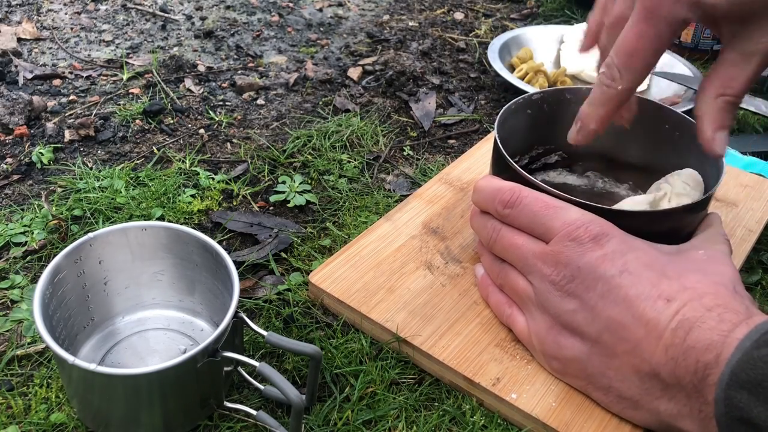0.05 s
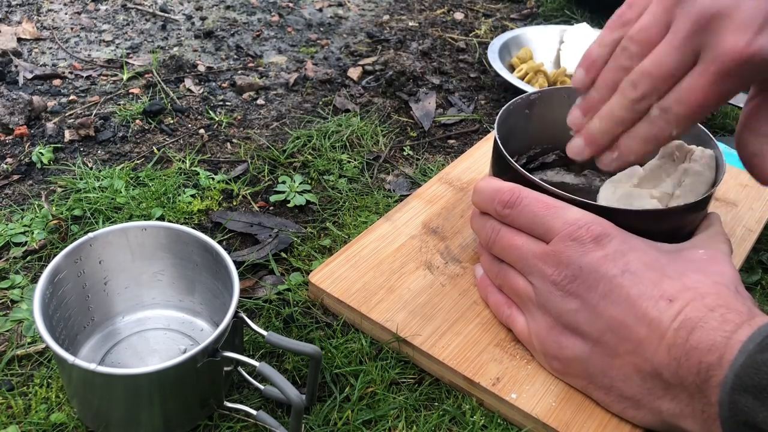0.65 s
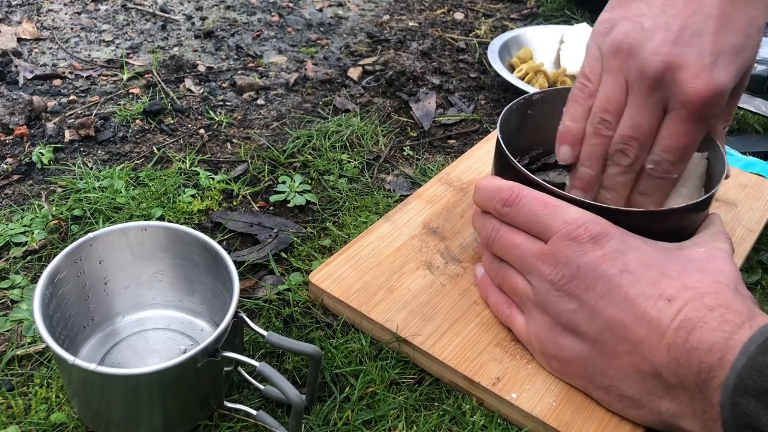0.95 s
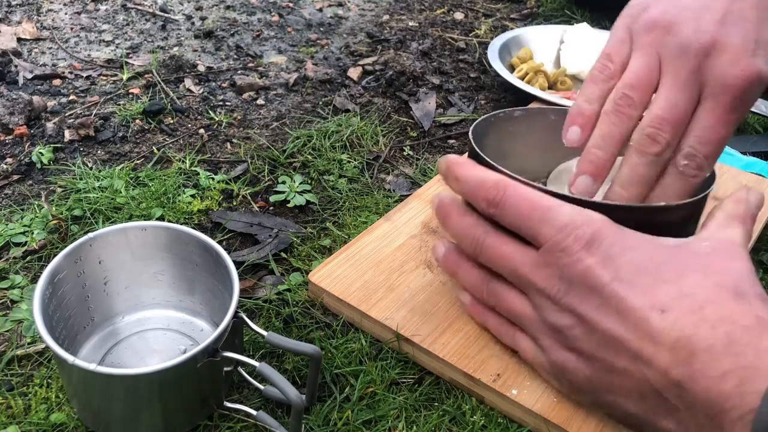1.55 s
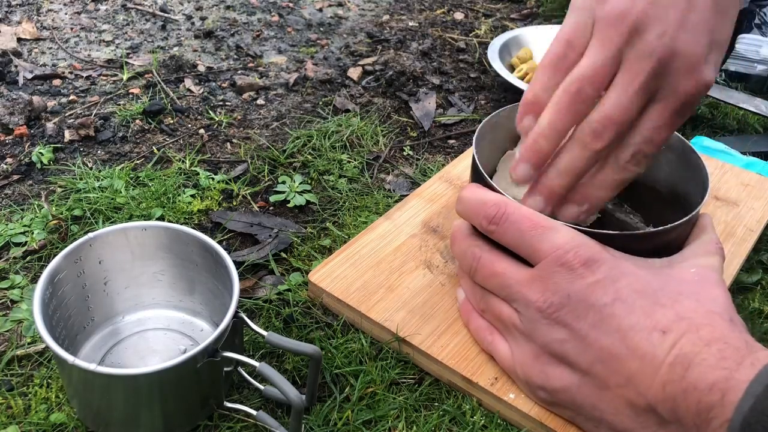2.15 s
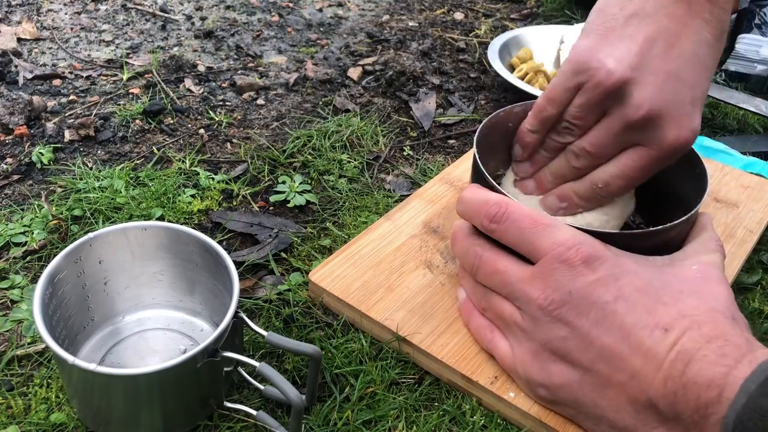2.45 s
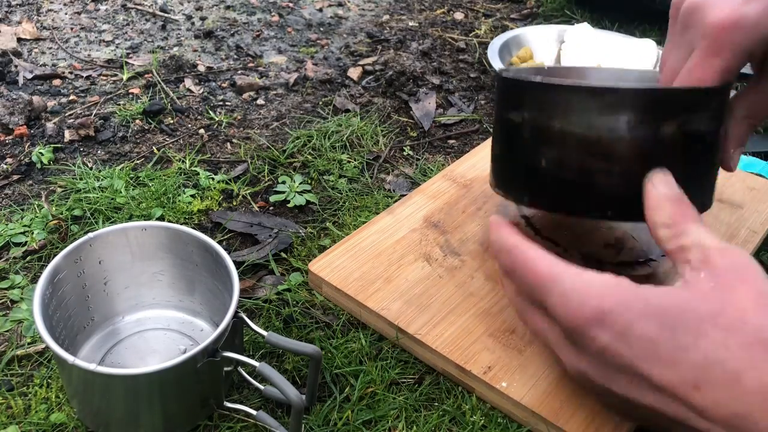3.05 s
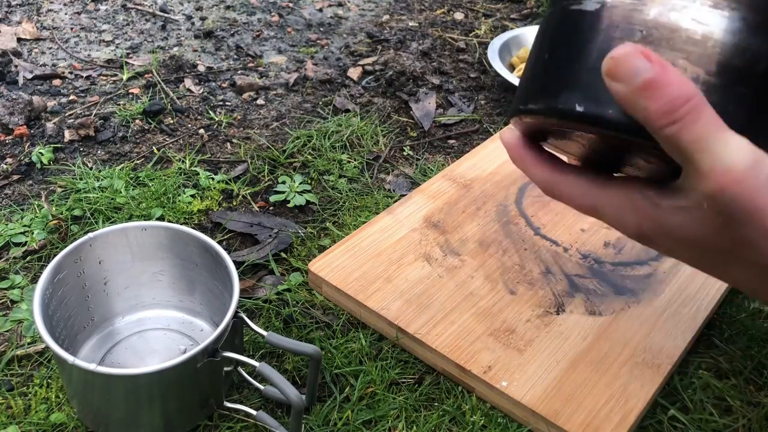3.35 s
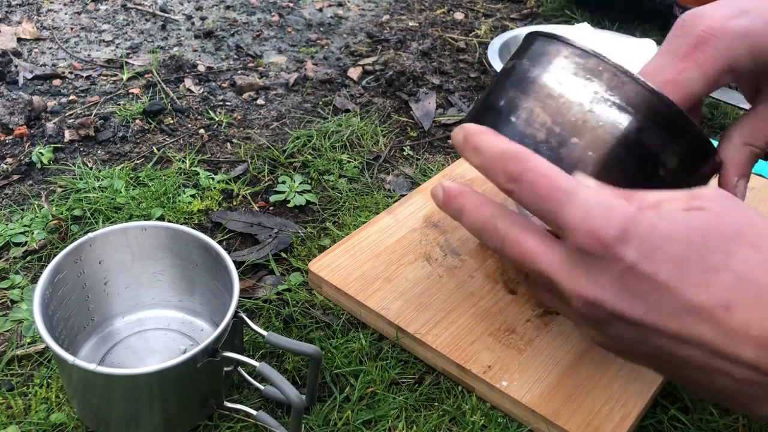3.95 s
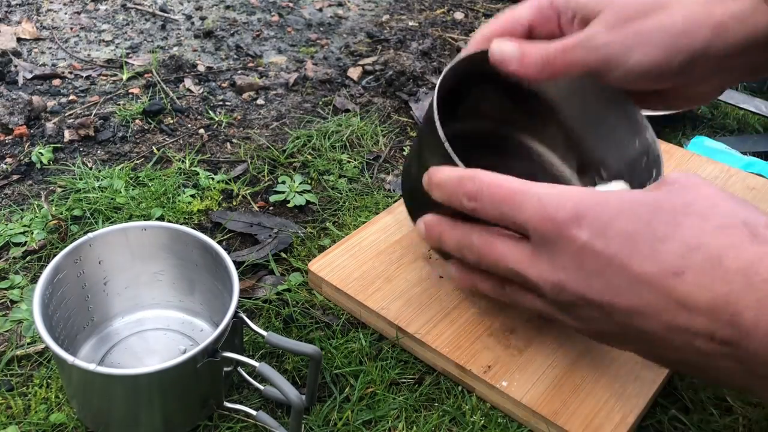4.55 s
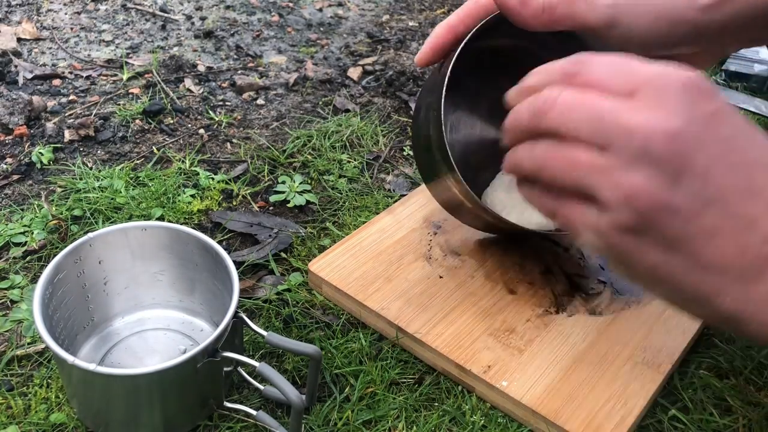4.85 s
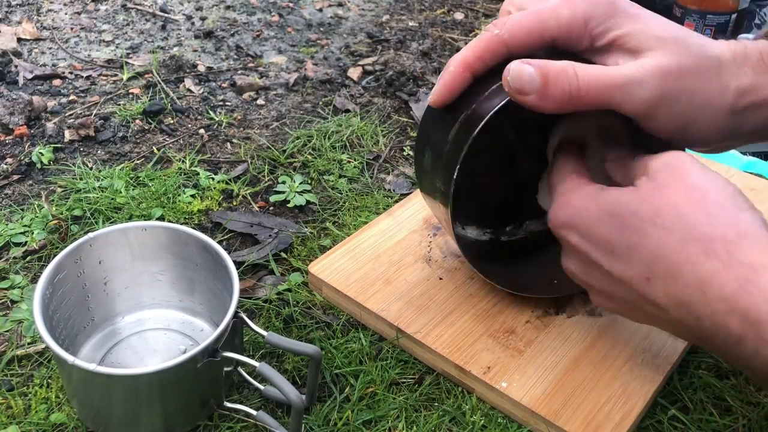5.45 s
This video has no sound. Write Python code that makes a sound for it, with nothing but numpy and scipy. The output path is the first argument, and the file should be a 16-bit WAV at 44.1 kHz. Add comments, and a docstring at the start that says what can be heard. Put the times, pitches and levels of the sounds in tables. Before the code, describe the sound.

Close up in the open air, dough and skin rub quietly along the inside of a metal pot, each push ending in a small smack. Much louder, the pot hits a wooden board with a brief ring, then scrapes. A little later come another scrape, a dull thud, a click of grit and a quick skid, then two choked knocks. The kneading carries on throughout above a faint hiss and low rumble.

```python
"""Outdoors, over faint hiss and rumble, a hand kneads dough in a small metal pot on a wooden board.
From the start, dough and skin rub along the wall, each push ends in a smack, and fingers tap the pot.
At 1.4 s the pot knocks hard on the board, its wall rings on, and its edge drags.
Near 2.75 s it slips with a scrape, a thud, a sharp click of grit and a short skid.
Two more knocks, choked by the grip, land at 3.9 s and 4.7 s, and the kneading carries on to the end."""
import sys
import numpy as np
from scipy import signal
from scipy.fft import rfft, irfft, next_fast_len
from scipy.io import wavfile
from scipy.ndimage import uniform_filter1d

SR = 44100
rng = np.random.default_rng(int(sys.argv[2]) if len(sys.argv) > 2 else 0)


def materialize(psi):
    """Save the field psi as 16-bit PCM at rate SR to the path in sys.argv[1].

    A 1-D psi becomes a single channel; in a 2-D psi each row is a channel.
    """
    bounded = np.clip(np.atleast_2d(psi).T, -1, 1)
    quanta = np.round(bounded * 32767).astype(np.int16)
    wavfile.write(sys.argv[1], SR, quanta)


N = 246955

# EQ curves for the noise layers. Each row: frequency in Hz, relative level in dB.
AIR_EQ = [(100, -2), (400, -5), (800, -12), (1500, -15.5), (3000, -17.5), (6000, -21.5), (9500, -27),
          (12000, -44), (16000, -51)]  # far outdoor hiss
RUMBLE_EQ = [(20, -29.5), (32, -20), (45, -6), (65, -4), (100, 0), (135, -2.5), (200, -9.5), (300, -18),
             (600, -50)]  # outdoor low end
RUB_EQ = [(1180, -63), (2000, -6), (2660, -4.5), (2900, -1.5), (4350, -2), (4740, -2), (6400, -3),
          (7270, -3.5), (11000, -7), (14300, -57.5), (22000, -120)]  # dough and skin on metal
BODY_EQ = [(200, -24), (450, -5), (800, 3.5), (1300, -1.5), (1900, -1.5), (2600, -11), (4000, -29.5)]  # the pot's hollow midrange
FIZZ_EQ = [(8000, -17.5), (10000, -2.5), (11500, 2.5), (13000, 0.5), (14500, -5), (15700, -5.5)]  # sticky dough
SNAP_EQ = [(1180, -56.5), (2000, -24), (2460, -8.5), (3120, -6.5), (4260, 4), (5030, 7), (6140, 12.5),
           (7980, 7.5), (8630, 6), (15500, 4), (16000, -32)]  # bright clicks and smacks
SKID_EQ = [(100, -27), (160, -3), (430, -19), (700, 10), (900, -6), (1200, -22), (1750, -10.5), (2400, -14),
           (3700, -11), (5000, -16), (7500, -12.5), (11000, -28), (16000, -40)]  # the base juddering on wood

# Resonances of the pot. Each row: frequency in Hz, width in Hz, relative level in dB.
HELD_POT_PEAKS = [(770, 150, 0.5), (1170, 70, 1), (1804, 44, 0), (3450, 90, -3), (4210, 78, 3),
                  (4940, 120, 6), (6450, 220, 7), (8310, 270, 4.5), (9070, 450, 11.5)]  # held, with dough inside
RIM_PEAKS = [(2940, 65, 15), (3626, 21, 17), (3830, 20, 9), (3880, 28, 16.5), (4302, 25, 14)]  # narrow rim tones in the skid
DRAG_PEAKS = [(789, 74, 0.5), (1186, 150, -10.5), (1740, 104, -5.5), (1885, 110, -10.5), (3010, 95, -15.5),
              (3430, 88, -13), (4490, 78, -11), (5530, 200, -19.5), (6550, 120, -21.5), (7800, 260, -20.5),
              (9700, 250, -21)]  # dragged on its edge

# The thin wall's ring. Each row: frequency in Hz, nominal t60 in seconds, relative level in dB.
FREE_WALL_MODES = [(750, 0.083, -28.5), (787, 0.14, -35), (1161, 0.18, -22), (1710, 0.14, -31),
                   (2200, .2, -59), (3400, 0.14, -46.5), (5250, .16, -53), (5520, 0.16, -55)]  # after a knock
PING_MODES = [(3626, 0.049, -20.5), (4340, 0.017, -8.5), (6160, 0.086, -22), (8549, 0.03, -11),
              (11230, 0.033, -17.5)]  # after a click
# Pot and board in contact. Each row: frequency in Hz, nominal t60 in seconds,
# then relative levels in dB when struck on the base, on the heel and on the wall.
POT_ON_BOARD_MODES = [(311.4, 0.015, -12, -10, -11), (394, 0.0055, -7, -4.5, -10.5),
                      (521, 0.056, -18.5, -15.5, -36), (570.5, 0.049, -23, -18.5, -15),
                      (744, 0.016, 3, 3, 2.5), (815.6, 0.0095, 5.5, 5.5, 6), (1119, 0.014, -7.5, -4.5, -4),
                      (1161, 0.035, -23.5, -18, -4), (1420, 0.0031, -28, -10, -4),
                      (1677, 0.046, -16, -19, -23.5), (1876, 0.029, -20, -25.5, -13.5),
                      (2172, 0.023, -38, -43, -12), (2802, 0.024, -45.5, -33.5, -19),
                      (3260, 0.016, -40.5, -46, -29.5), (3540, 0.021, -47.5, -37.5, -31),
                      (3930, 0.017, -51.5, -47, -32.5), (4370, 0.027, -45, -39.5, -46)]

# Fader curve for hands that never leave the pot. Each row: time in seconds, relative level in dB.
HANDLING_FADER = [(0.0, -64), (0.45, -65.5), (0.56, -87), (0.78, -72.5), (1.51, -60.5), (2.26, -70),
                  (2.63, -54.5), (2.74, -57), (3.24, -58.5), (3.48, -62), (3.76, -59.5), (3.96, -67.5),
                  (4.23, -69), (4.35, -58), (5.01, -65.5), (5.6, -60.5)]
# The hand pushes dough along the wall.
# Each row: start and release in seconds, rubbing level in dB, relative pressure on the pot in dB.
PUSH_CUES = [(0.271, 0.402, -58.5, -1), (0.476, 0.634, -59, -0.5), (0.739, 0.836, -58.5, 0),
             (0.909, 1.037, -57.5, 0.5), (1.215, 1.251, -52, 5.5), (1.48, 1.602, -53, 0.5),
             (1.777, 1.877, -52, 0.5), (2.55, 2.718, -41.5, 1.5), (2.923, 2.983, -62, 15.5),
             (3.653, 3.803, -51.5, -3), (3.76, 3.918, -53, -3.5), (4.131, 4.184, -59.5, -5.5),
             (4.202, 4.429, -56, -7), (4.6, 4.808, -58, 0), (5.193, 5.297, -58, -4.5),
             (5.333, 5.484, -57.5, 2)]
# Dough peels off the metal. Each row: start in seconds, rubbing level in dB, relative pressure in dB.
PEEL_CUES = [(.191, -53, 1.5), (1.648, -55.5, 7.5), (2.851, -51.5, -6), (4.495, -59, -10),
             (4.984, -56, -12)]
# The pot's edge drags on the board.
# Each row: start and length in seconds, level in dB, pitch factor from tilt and grip.
SCRAPE_CUES = [(1.394, 0.061, -45, 1.03), (1.45, 0.21, -51, .95), (1.525, .035, -45, 0.95),
               (1.57, .046, -42.5, 1.02), (2.543, 0.25, -47, 1), (3.758, 0.12, -49, 1.07),
               (4.25, 0.066, -47.5, 0.974), (4.352, 0.022, -43, 0.96), (4.395, 0.045, -51, 1)]
# Grit clicks under the pot. Each row: start in seconds, level in dB, decay time in seconds.
GRIT_CUES = [(1.655, -41, 0.0074), (2.7, -34, .01), (2.7511, -18.5, .0022), (2.857, -41, 0.012),
             (4.358, -44, 0.0046), (4.714, -39.5, .002)]
# Sticky fingers tick faintly. Each row: start in seconds, relative level in dB.
TICK_CUES = [(0.7746, -48), (2.0194, -48), (2.2393, -45.5), (3.2266, -45.5), (4.04, -49.5)]
# Soft taps of fingers and pot. Each row: start in seconds, relative level in dB, centre in Hz.
TAP_CUES = [(0.544, -32.5, 860), (0.776, -43.5, 880), (0.834, -37.5, 1050), (1.248, -35.5, 520),
            (2.751, -24, 700), (3.162, -32, 1200), (3.468, -42.5, 820), (4.207, -31, 750),
            (4.524, -37, 547), (4.848, -40, 522)]
# The pot's weight shifts. Each row: start in seconds, level in dB, centre in Hz, decay time in seconds.
THUD_CUES = [(2.724, -33, 197, 0.0095), (3.16, -43, 390, 0.041)]
# Hard knocks. Each row: start in seconds, level in dB, spot struck (0 base, 1 heel, 2 wall),
# relative free wall ring in dB, ring time factor left by the grip,
# rebound delay in seconds, relative rebound level in dB.
KNOCK_CUES = [(1.3896, 0, 0, -0.5, 1.04, 0.0015, -10.5), (3.8589, 2.16, 1, -23.5, 1, .00266, -13.5),
              (4.714, 0.3, 2, -23, 0.95, 0.002064, -10.5)]


def gain_of(db):
    """Decibels to a factor."""
    return 10 ** (np.asarray(db) / 20)


def unit_rms(x):
    """Scales to rms 1."""
    return x / np.sqrt(np.mean(x ** 2) + 1e-20)


def add(mix, start, sound):
    """Lays a sound into the mix at a start time in seconds."""
    part = mix[max(round(start * SR), 0):][:len(sound)]
    part += sound[:len(part)]


def equalised(x, curve, peaks=()):
    """Runs x through an EQ curve with resonant peaks on top, at rms 1."""
    size = next_fast_len(len(x))
    hz = np.fft.rfftfreq(size, 1 / SR)
    curve_hz, curve_db = np.transpose(curve)
    shape_db = np.interp(np.log(hz + 1), np.log(curve_hz), curve_db)
    for centre, width, lift in peaks:
        shape_db += lift / (1 + (2 * (hz - centre) / width) ** 2)
    return unit_rms(irfft(rfft(x, size) * gain_of(shape_db), size)[:len(x)])


def drift(per_s, size=SR):
    """A slow random wander of rms 1."""
    return unit_rms(np.interp(np.arange(size) * per_s / SR, np.arange(size), rng.standard_normal(size)))


def slips(per_s, spread_db, size=SR):
    """Friction: a dense train of tiny slips of uneven height."""
    height = gain_of(spread_db * np.minimum(rng.exponential(1, size), 4))
    return unit_rms(height * rng.choice([-1, 1], size) * (rng.random(size) < per_s / SR))


def ring(modes, t):
    """Decaying sine modes; neighbours swing in opposite directions."""
    return sum((-1) ** k * gain_of(db - 60 * t / t60) * np.sin(2 * np.pi * hz * t)
               for k, (hz, t60, db) in enumerate(modes))


def pot_burst(curve, decay_s, attack_s):
    """A noise hit coloured by the held pot, its energy in proportion to its decay time."""
    t = np.arange(SR // 4) / SR
    noise = equalised(rng.standard_normal(len(t)), curve, HELD_POT_PEAKS)
    hit = noise * np.exp(-t / decay_s) * (1 - np.exp(-t / attack_s))
    return hit * np.sqrt(decay_s * SR / 2 / np.sum(hit ** 2))


def outdoors(air_db=-59.5, rumble_db=-55, swell_db=1.3):
    """The bed: a steady far hiss over a low, gently swelling rumble."""
    air = equalised(rng.standard_normal(N), AIR_EQ)
    rumble = equalised(rng.standard_normal(N), RUMBLE_EQ)
    return gain_of(air_db) * air + gain_of(rumble_db + swell_db * drift(per_s=8.5, size=N)) * rumble


def dappled(x, depth_db=3.5):
    """A moving hand shifts the pot's many small resonances: bands swell and fade in patches."""
    spectrogram = signal.stft(x, nperseg=512)[2]
    across_bands = uniform_filter1d(rng.standard_normal(spectrogram.shape), size=5, axis=0)
    patches = unit_rms(uniform_filter1d(across_bands, size=8, axis=1))
    patchy = signal.istft(spectrogram * gain_of(depth_db * patches))[1]
    return x.std() * unit_rms(patchy[:len(x)])


def rubbing(pressure_db, size=SR, body_db=-0.5, fizz_db=-6, uneven_db=2):
    """Dough and skin hiss as they slip; pressing brings out the pot, a light touch the sticky fizz."""
    grab = gain_of(uneven_db * drift(per_s=100, size=size))  # the dough grabs and lets go
    hiss = equalised(slips(per_s=10000, spread_db=2, size=size), RUB_EQ)
    body = equalised(slips(per_s=6000, spread_db=0.5, size=size), BODY_EQ, HELD_POT_PEAKS)
    fizz = equalised(slips(per_s=5500, spread_db=-2.5, size=size), FIZZ_EQ)
    blend = hiss + gain_of(body_db + pressure_db) * body + gain_of(fizz_db - pressure_db / 2) * fizz
    return dappled(grab * blend)


def kneading(handling_trim_db=-2, release_s=0.02, peel_attack_s=0.008, peel_fade_s=0.061):
    """Pushes build up and let go, peels start at once and fade; light rubbing goes on between them."""
    t = np.arange(SR) / SR
    handling_db = np.interp(np.arange(N) / SR, *np.transpose(HANDLING_FADER))
    out = gain_of(handling_trim_db + handling_db) * rubbing(pressure_db=3, size=N)
    for start, end, db, pressure_db in PUSH_CUES:
        build = np.minimum(t / (end - start), 1) ** 0.98  # friction grows with the way travelled
        release = np.exp(-np.maximum(start + t - end, 0) / release_s)
        add(out, start, gain_of(db) * build * release * rubbing(pressure_db))
    for start, db, pressure_db in PEEL_CUES:
        envelope = np.minimum(t / peel_attack_s, 1) * np.exp(-(t / peel_fade_s) ** 2)
        add(out, start, gain_of(db) * envelope * rubbing(pressure_db))
    return out


def scrapes(uneven_db=1.2, speed_up_share=0.63):
    """The edge slips on the wood grain and rings the pot; each drag speeds up, then slows to rest."""
    out, t = np.zeros(N), np.arange(SR) / SR
    hz = np.fft.rfftfreq(SR, 1 / SR)
    for start, length, db, pitch in SCRAPE_CUES:
        pot = sum((-1) ** k * gain_of(lift) / (1 + 2j * (hz - centre * pitch) / width)
                  for k, (centre, width, lift) in enumerate(DRAG_PEAKS))
        friction = slips(per_s=4700, spread_db=-1.5) * gain_of(uneven_db * drift(per_s=140))
        scrape = unit_rms(irfft(rfft(friction) * pot, SR))
        speed = np.sin(np.pi * np.interp(t / length, [0, speed_up_share, 1], [0, 0.5, 1]))
        add(out, start, gain_of(db) * speed * scrape)
    return out


def skid(start=2.765, db=-28.5, attack_s=0.002, caught_s=0.014, stop_s=0.0062, tail_db=-33, tail_s=0.03):
    """The base breaks loose, judders across the wood and is caught; the rim rings on faintly."""
    out, t = np.zeros(N), np.arange(SR) / SR
    attack = np.minimum(t / attack_s, 1)
    since_caught = np.maximum(t - caught_s, 0)
    release = np.exp(-since_caught / stop_s) + gain_of(tail_db) * np.exp(-since_caught / tail_s)
    judder = equalised(slips(per_s=2900, spread_db=2), SKID_EQ, RIM_PEAKS)
    add(out, start, gain_of(db) * attack * release * judder)
    return out


def snap(decay_s, ping_db=1):
    """A crisp crack, after which the wall pings."""
    crack = pot_burst(SNAP_EQ, decay_s, attack_s=0.00005)
    return crack + gain_of(ping_db) * ring(PING_MODES, np.arange(len(crack)) / SR)


def clicks(tick_trim_db=-8.5, smack_trim_db=0.5):
    """Grit snaps under the pot, fingers unstick, and the dough smacks as each push lets go."""
    out = np.zeros(N)
    for start, db, decay_s in GRIT_CUES:
        add(out, start, gain_of(db) * snap(decay_s))
    for start, db in TICK_CUES:
        add(out, start, gain_of(tick_trim_db + db) * snap(decay_s=0.0074))
    for _, end, db, _ in PUSH_CUES:
        add(out, end, gain_of(smack_trim_db + db) * snap(decay_s=0.0059))
    return out


def padded_blow(centre_hz, octaves, decay_s, skirt_db=-12, floor_db=-50):
    """A soft hit stirs only one band of the held pot."""
    band_hz = centre_hz * 2 ** (octaves * np.array([-3, -1, 0, 1, 3]))
    band_db = [floor_db, skirt_db, 0, skirt_db, floor_db]
    return pot_burst(np.c_[band_hz, band_db], decay_s, attack_s=0.0003)


def taps(tap_trim_db=-7.5):
    """Fingers tap the wall, and the pot's weight shifts with a dull thud."""
    out = np.zeros(N)
    for start, db, hz in TAP_CUES:
        add(out, start, gain_of(tap_trim_db + db) * padded_blow(hz, octaves=0.43, decay_s=0.0081))
    for start, db, hz, decay_s in THUD_CUES:
        add(out, start, gain_of(db) * padded_blow(hz, octaves=0.92, decay_s=decay_s))
    return out


def knocks(attack_s=0.0001, rattle_db=-41, loose_rattle_db=-40, rattle_t60=0.13,
           glide=0.039, glide_s=0.04, rock_hz=42, rock_depth=0.23):
    """The pot lands, rebounds within milliseconds, and its wall rings as far as the grip allows."""
    out, t = np.zeros(N), np.arange(SR // 2) / SR
    bent_t = t + glide * (t - glide_s * (1 - np.exp(-t / glide_s)))  # pitch rises as the pot tips
    flutter = 1 + rock_depth * np.cos(2 * np.pi * rock_hz * t)  # the pot rocks on its edge
    for start, db, spot, free_db, sustain, rebound_s, rebound_db in KNOCK_CUES:
        modes = [(hz, t60 * sustain, spot_db[round(spot)]) for hz, t60, *spot_db in POT_ON_BOARD_MODES]
        blow = ring(modes, t) * (1 - np.exp(-t / attack_s))
        rattle = equalised(rng.standard_normal(len(t)), BODY_EQ, HELD_POT_PEAKS)
        rattle *= gain_of(-60 * t / (rattle_t60 * sustain))
        wall = ring(FREE_WALL_MODES, bent_t) * flutter + gain_of(loose_rattle_db) * rattle
        add(out, start, gain_of(db) * (blow + gain_of(rattle_db) * rattle + gain_of(free_db) * wall))
        add(out, start + rebound_s, gain_of(db + rebound_db) * blow)
    return out


def scene():
    """A mono mix, close up and in open air."""
    return (knocks() + taps() + clicks() + skid() + scrapes() + kneading() + outdoors())[None]


def record(dry):
    """A steep high cut at 15.8 kHz takes off the very top."""
    high_cut = signal.firwin(511, 15800, window=("kaiser", 9), fs=SR)
    return signal.oaconvolve(dry, high_cut[None], "same")


dry = scene()
out = record(dry)
materialize(out)
```